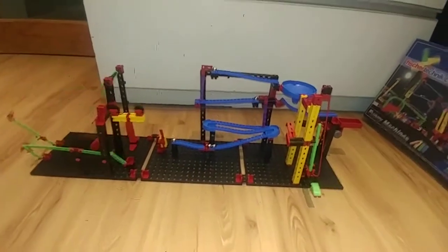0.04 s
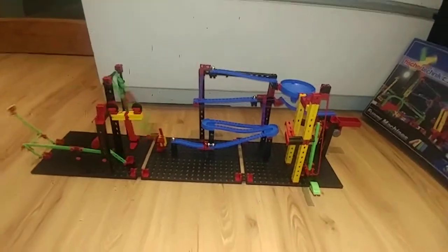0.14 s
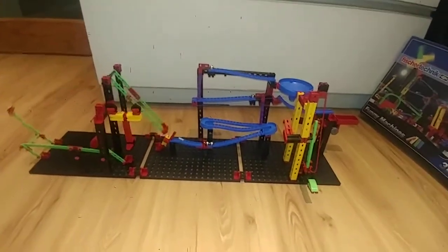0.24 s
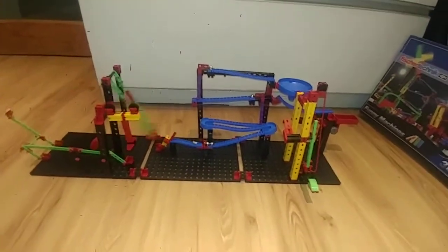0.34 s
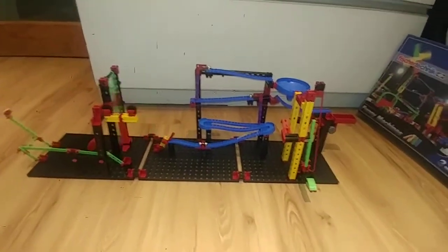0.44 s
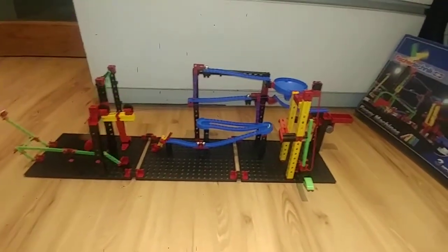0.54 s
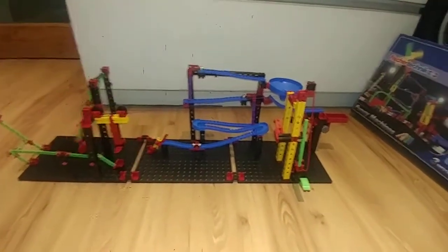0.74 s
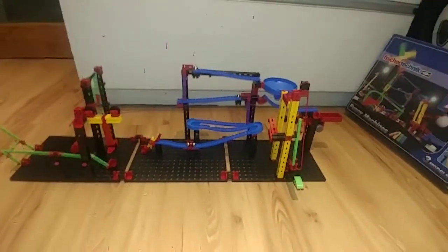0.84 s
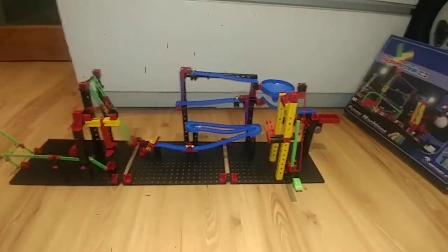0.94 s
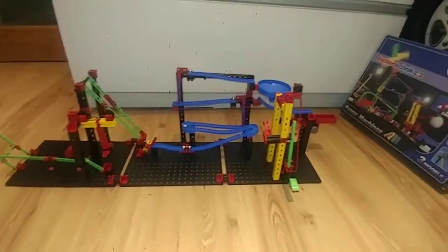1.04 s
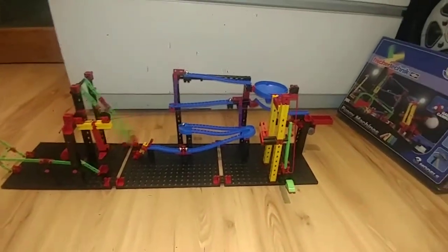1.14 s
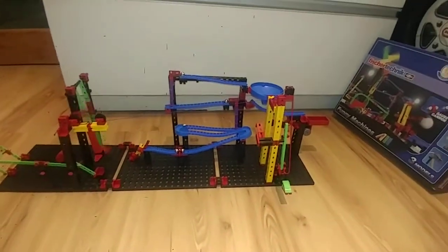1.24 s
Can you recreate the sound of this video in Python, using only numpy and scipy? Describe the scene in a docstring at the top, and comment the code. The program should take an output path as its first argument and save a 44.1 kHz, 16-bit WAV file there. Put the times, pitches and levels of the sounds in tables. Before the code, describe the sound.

Plastic toy machine parts clack, then a hard ball lands sharply and rolls along a track.

```python
"""A construction-toy ball machine on a wooden floor, heard in stereo from across a small, live room.
It opens on a low mains hum, a high ring dying away and a ball's faint rumble on a plastic track.
Plastic levers tick and clack against their frame. At 0.44 s the hard ball lands with one bright,
ringing clack; two knocks follow, and it rolls on along the track with a growing whirr."""
import sys
import numpy as np
from scipy import signal
from scipy.fft import rfft, irfft
from scipy.io import wavfile
from scipy.ndimage import uniform_filter1d

SR = 44100
rng = np.random.default_rng(int(sys.argv[2]) if len(sys.argv) > 2 else 0)


def wav_record(signal):
    """Record a signal, one row per channel, as 16-bit PCM in the file named by sys.argv[1]."""
    frames = np.transpose(np.atleast_2d(signal))
    bounded = np.clip(frames, -1, 1)
    # unit amplitude maps onto the largest positive 16-bit level
    quanta = np.round(bounded * 32767).astype(np.int16)
    wavfile.write(sys.argv[1], SR, quanta)


N = 57330

# Still air in the room. Each row: frequency in Hz, relative level in dB.
AIR_COLOUR = [(20, -30.5), (30, -20), (42, -8), (60, 1), (90, 3.5), (130, -6.5), (180, -8.5), (235, -1.5),
              (310, -11), (450, -10.5), (800, -20), (1600, -26.5), (4000, -44), (9000, -32.5), (10500, -59),
              (16000, -45)]
# Mains hum. Each row: frequency in Hz, level in dB before the swell.
HUM_TONES = [(59.3, -47.5), (156, -66.5), (247, -61)]
# Swell of the hum. Each row: time in seconds, gain in dB.
HUM_GAIN = [(0, -6), (.25, 6), (.5, -2.5), (.85, 3.5), (1.15, 6.5), (1.3, 2)]
# The high ring left in the room. Each row: frequency in Hz, relative level in dB.
FADING_COLOUR = [(300, 3.5), (1800, -20.5), (3000, 1), (6000, 0.5), (7500, -8.5), (8400, 6.5), (9050, 13),
                 (9600, 1), (10300, -33), (16000, -17)]

# Rumble and whirr of the track. Each row: time in seconds, level in dB.
RUMBLE_LEVEL = [(0.598, -51), (.8, -56), (.98, -61), (1.049, -48.5), (1.12, -49), (1.199, -55), (1.3, -60)]
WHIRR_LEVEL = [(.6, -61.5), (0.899, -67), (0.999, -59), (1.099, -58.5), (1.2, -56.5), (1.26, -53.5),
               (1.3, -52.5)]
# Their spectra. Each row: frequency in Hz, relative level in dB.
RUMBLE_SPECTRUM = [(100, -5.5), (250, -3), (420, 8.5), (700, 4), (1100, 0.5), (1700, -15), (3500, -35.5),
                   (8500, -41.5), (11000, -47.5)]
WHIRR_SPECTRUM = [(800, -22.5), (1800, -5.5), (2200, 6), (2650, 5.5), (3300, -11.5), (4800, -6),
                  (7000, -35), (9000, -23), (10500, -37.5)]

# Blows on the frame. Each row: start in seconds, level in dB, base plate thud in dB, small parts' ring
# in dB, treble tilt in dB per octave, left over right in dB, direct sound in dB, pitch of the struck
# piece in Hz, its level in dB.
FRAME_BLOWS = [(.0703, -30.5, 7, -15, 1, 7, -4, 7800, -7), (0.0972, -36, 0, -13, 16, -2, 4.5, 5800, 9.5),
               (0.113, -20.5, -7, -13.5, 2.5, 0, -4.5, 5750, -6.5),
               (0.217, 1, -11.5, 7, 4, 0, -4, 5596, -6.5), (0.222, -9, 7, -3, -1, -3, 2, 3900, -6),
               (.2407, -0.5, 8, 8.5, 5, -3.5, -1.5, 2820, -14.5), (0.2429, -5, 0, -4, -2, 4, -4.5, 1060, 4),
               (0.2479, -10, 7, -3.5, -0.5, -3.5, -1, 3400, 3),
               (0.2667, -9.5, 0, 6.5, 0, 3.5, 4.5, 3180, 2.5),
               (0.43, -24.5, -7, -9.5, -30, -0.5, -8, 2900, -3.5),
               (0.4419, -19, -5.5, -5, -2, 10, -2.5, 3700, -4.5),
               (0.586, -9, -3, 4, -4.5, -0.5, -1.5, 2623, -2), (.683, -24, 9.5, -19, -4.5, -6, -1, 3190, 1)]
# Cracks of the plastic and of the ball. Each row: frequency in Hz, relative level in dB.
PLASTIC_CRACK = [(100, -13.5), (300, -14.5), (1000, -3.5), (1500, -14), (2000, 1.5), (3000, -1), (4200, 2),
                 (5800, 0.5), (7200, -3.5), (9400, -0.5), (10200, -33.5), (11700, -24), (16000, -17.5)]
BALL_CRACK = [(100, -34.5), (250, -23), (650, -5), (1150, -13), (1600, -14), (3000, -5), (4200, -1),
              (5000, -0.5), (6200, 5.5), (7200, -1), (8700, 13.5), (10500, -3), (13000, 9), (15700, 4)]
# Landings of the ball. Each row: start in seconds, hard clack in dB, hollow knock in dB.
LANDINGS = [(0.4442, 2.5, 3), (0.59, -33, -6)]
# Modes of what is struck. Each row: frequency in Hz, relative level in dB, seconds to fall 60 dB.
PLATE_MODES = [(391, -3.5, 0.12), (505, -2.5, .045), (782, -3, 0.046), (1094, -4.5, .02), (1586, -1.5, .02),
               (2900, -2, 0.0084), (3017, -9.5, .015)]  # the base plate
PARTS_MODES = [(8050, -17, .006), (8510, 5.5, 0.018), (9160, -19, .006)]  # the small hard parts
CLACK_MODES = [(8000, 4.5, .015), (9250, -0.5, .018), (9050, -4.5, .015), (9420, -7, .015),
               (11400, -9.5, .015), (11970, -2, .015), (13350, -11, .015), (13586, -1, .015),
               (15130, -7, .015), (15500, -8, 0.01)]  # rung by the ball
SINGING_MODES = [(8165, -3, .4), (8207, -5, .42), (8607, -7, .3), (8648, 0, .33), (9243, -5, .3),
                 (9378, -5, .3), (12741, -9, .26), (14080, -6, .2), (14676, -10, .27), (15665, -11, .27)]  # the clack's purest, longest partials
HOLLOW_MODES = [(230, -16.5, .05), (507.7, 1, .045), (660, -1, 0.061), (1005, -3.5, 0.018),
                (1168, -2.5, 0.037)]  # the part that the ball strikes

# The room's reverberation. Each row: frequency in Hz, seconds to fall 60 dB.
ROOM_DECAY = [(150, 0.7), (600, 0.3), (2000, 0.76), (4200, .45), (6000, 0.54), (8500, .44), (12000, .35),
              (16000, .28)]
# Room sound at the two microphone ports. Each row: frequency in Hz, likeness from 0 to 1.
PORT_LIKENESS = [(60, .96), (250, 0.96), (600, .65), (1200, 0.18), (3000, 0.026), (16000, .02)]
# First echoes off floor and walls. Each row: delay in seconds, left gain, right gain.
FIRST_ECHOES = [(.0008, 0.33, .6), (.0029, 0.34, .35), (.0078, 0.68, .15), (0.0118, 0.72, .5),
                (0.0125, .55, .55), (0.0257, 0.22, .35)]
# Imbalance of the microphone. Each row: frequency in Hz, left over right in dB.
PORT_BALANCE = [(60, -2), (170, 1), (700, -1), (3000, -5), (6000, -1), (8500, 0), (13000, 3.5)]

AIR_DB, HUM_WAVER = -46, 0.094
FADING_DB, FADING_T60_S = -46, 0.65
BUMPS_PER_S, BUMP_SPREAD_DB = 1100, 5
PLASTIC_DB, PLATE_DB, PARTS_DB = 4, -13.5, -13.5
PLASTIC_T60_S, PIECE_T60_S, BALL_T60_S = .012, .0099, .04
BALL_DB, CLACK_DB, SING_DB, HOLLOW_DB = 24, 9.5, 7.5, -5
CLACK_RISE_S, SING_RISE_S = .0005, .017
BALL_DIRECT_DB, ECHO_DB, ROOM_DB = -11.5, -19, -1.5
PORT_LAG_S, CUTOFF_HZ = .00012, 15850


def amp(db):
    """Decibels to gain."""
    return 10 ** (np.asarray(db) / 20)


def read(points, hz):
    """Reads a table on a log-frequency axis."""
    f, value = np.transpose(points)
    return np.interp(np.log(hz + 1), np.log(f + 1), value)


def unit_rms(x):
    """Scales to rms 1."""
    return x / np.sqrt(np.mean(x ** 2) + 1e-20)


def unit_energy(x):
    """Scales to energy 1."""
    return x / np.sqrt(np.sum(x ** 2) + 1e-20)


def add(mix, s, sound):
    """Mixes a sound in at s seconds."""
    part = mix[:, max(round(s * SR), 0):][:, :sound.shape[-1]]
    part += sound[..., :part.shape[1]]


def colour(x, points):
    """Shapes the spectrum of a signal."""
    size = 2 * x.shape[-1]
    gain = amp(read(points, np.fft.rfftfreq(size, 1 / SR)))
    return irfft(rfft(x, size) * gain)[..., :size // 2]


def flatten(x, width_hz):
    """Evens out broad peaks and dips in the spectrum of a noise burst."""
    size = 2 * x.shape[-1]
    z = rfft(x, size)
    power = uniform_filter1d(abs(z) ** 2, int(width_hz * size / SR) + 1, axis=-1)
    return irfft(z / np.sqrt(abs(power) + 1e-12))[..., :size // 2]


def diffuse(pair):
    """Makes two unrelated signals alike in the bass, as room sound is at the two ports."""
    left, other = rfft(pair)
    same = np.clip(read(PORT_LIKENESS, np.fft.rfftfreq(pair.shape[1], 1 / SR)), 0, 1)
    right = same * left + np.sqrt(1 - same ** 2) * other
    return irfft(np.array([left, right]), pair.shape[1])


def in_room(dry, direct_db):
    """The way to the microphone: slightly dull direct sound and echoes, then a tail dying band by band."""
    t = np.arange(SR) / SR
    hz, when, bands = signal.stft(diffuse(rng.choice([-1., 1.], (2, SR))), SR, nperseg=256)
    decay = amp(-60 * when / read(ROOM_DECAY, hz)[:, None])
    tail = signal.istft(bands * decay, SR, nperseg=256)[1][:, :SR]
    early_lift = 1 + amp(-6.5) * np.exp(-(t / .03) ** 2)
    build_up = 1 - np.exp(-t / .0059)
    tail = flatten(tail * early_lift, width_hz=50) * build_up
    early = np.zeros((2, SR))
    early[:, 1] = amp(direct_db)
    for s, left, right in FIRST_ECHOES:
        add(early, s, amp(ECHO_DB) * np.array([[left], [right]]))
    early[0] = np.interp(t - PORT_LAG_S, t, early[0], left=0)  # the right port hears it first
    early = signal.lfilter(*signal.butter(2, 14000, fs=SR), early)
    response = early + amp(ROOM_DB) * np.sqrt(2) * unit_energy(tail)
    return signal.fftconvolve(dry, response, axes=1)[:, :N]


def room_tone():
    """A wavering mains hum over soft, dark air noise all round the microphone."""
    t = np.arange(N) / SR
    out = amp(AIR_DB) * unit_rms(colour(diffuse(rng.standard_normal((2, N))), AIR_COLOUR))
    swell_db = np.interp(t, *np.transpose(HUM_GAIN))
    waver_hz = np.geomspace(.5, 8, 12)
    for hz, db in HUM_TONES:
        waver = unit_rms(sum(np.sin(2 * np.pi * (f * t + rng.random())) / np.sqrt(f) for f in waver_hz))
        tone = np.sqrt(2) * np.sin(2 * np.pi * (hz * t + rng.random()))
        out += amp(db + swell_db) * (1 + HUM_WAVER * waver) * tone
    return out


def fading_ring():
    """The room still rings with a blow that has just passed."""
    t = np.arange(N) / SR
    wash = unit_rms(colour(diffuse(rng.standard_normal((2, N))), FADING_COLOUR))
    return wash * amp(FADING_DB - 60 * t / FADING_T60_S)


def rolling():
    """Tiny bumps under the ball make the track rumble and whirr, at a steady level until 0.6 s."""
    t = np.arange(N) / SR
    bumps = (rng.random(N) < BUMPS_PER_S / SR) * rng.choice([-1, 1], N)
    bumps = bumps * amp(BUMP_SPREAD_DB * np.minimum(rng.exponential(1, N), 4))
    heard = in_room(np.array([bumps, bumps]), BALL_DIRECT_DB)
    rumble = unit_rms(colour(heard, RUMBLE_SPECTRUM)) * amp(np.interp(t, *np.transpose(RUMBLE_LEVEL)))
    whirr = unit_rms(colour(heard, WHIRR_SPECTRUM)) * amp(np.interp(t, *np.transpose(WHIRR_LEVEL)))
    return rumble + whirr


def crack(points, t60, tilt_db=0, size=4096):
    """A hard contact of a millisecond or two and the brief chatter after it."""
    hz, t = abs(np.fft.fftfreq(size, 1 / SR)), np.arange(size) / SR
    log_gain = np.log(amp(read(points, hz) + tilt_db * np.log2((hz + 300) / 3000)))
    # Minimum phase: nothing sounds ahead of the contact.
    tick = np.fft.ifft(np.exp(np.conj(signal.hilbert(log_gain)))).real[:size // 2]
    contact = np.exp(-(t / .002) ** 2)
    force = contact + amp(-60 * t / t60)
    chatter = flatten(rng.choice([-1., 1.], size) * force, width_hz=120)
    rise = 1 - np.exp(-t / .0005)
    return unit_energy(signal.fftconvolve(chatter * rise, tick))


def ring(modes):
    """A struck part rings as dying sines, each with the energy that its row gives."""
    t = np.arange(SR // 2) / SR
    return sum(amp(db) * unit_energy(np.sin(2 * np.pi * hz * t) * amp(-60 * t / t60))
               for hz, db, t60 in modes)


def frame_knocks():
    """Each blow cracks on the plastic, thumps the base plate, rings the small parts and struck piece."""
    out = np.zeros((2, N))
    for s, db, thud_db, ring_db, tilt_db, pan_db, direct_db, piece_hz, piece_db in FRAME_BLOWS:
        dry = np.zeros((2, N))
        add(dry, s, amp(PLASTIC_DB) * crack(PLASTIC_CRACK, PLASTIC_T60_S, tilt_db))
        add(dry, s, amp(PLATE_DB + thud_db) * ring(PLATE_MODES))
        add(dry, s, amp(PARTS_DB + ring_db) * ring(PARTS_MODES))
        add(dry, s, ring([(piece_hz, piece_db, PIECE_T60_S)]))
        out += in_room(dry, direct_db) * amp([[db + pan_db / 2], [db - pan_db / 2]])
    return out


def ball_clack():
    """The ball lands: a hard crack, a cluster of high modes and a hollow knock; a few partials sing on."""
    t = np.arange(SR // 2) / SR
    dry, singing = np.zeros((2, N)), np.zeros((2, N))
    for s, db, hollow_db in LANDINGS:
        add(dry, s, amp(db + BALL_DB) * crack(BALL_CRACK, BALL_T60_S))
        add(dry, s, amp(db + CLACK_DB) * ring(CLACK_MODES) * (1 - np.exp(-t / CLACK_RISE_S)))
        add(dry, s, amp(hollow_db + HOLLOW_DB) * ring(HOLLOW_MODES))
        add(singing, s, amp(db + SING_DB) * ring(SINGING_MODES) * (1 - np.exp(-t / SING_RISE_S)))
    return in_room(dry, BALL_DIRECT_DB) + singing


def scene():
    """The machine and its room, from where the microphone stands."""
    return frame_knocks() + ball_clack() + fading_ring() + rolling() + room_tone()


def record(dry):
    """The microphone: two unequal ports, overload on the loudest peaks, and a band limit."""
    lean = amp(read(PORT_BALANCE, np.fft.rfftfreq(2 * N, 1 / SR)) / 2)
    heard = irfft(rfft(dry, 2 * N) * np.array([lean, 1 / lean]))[:, :N]
    lowpass = signal.firwin(255, CUTOFF_HZ, window=("kaiser", 8), fs=SR)
    return signal.oaconvolve(np.clip(heard, -1, 1), lowpass[None], "same")


dry = scene()
out = record(dry)
wav_record(out)
```